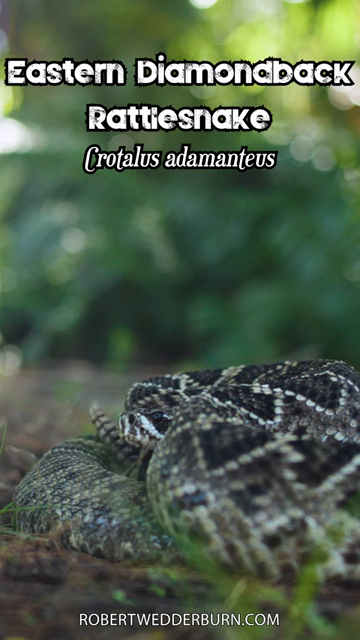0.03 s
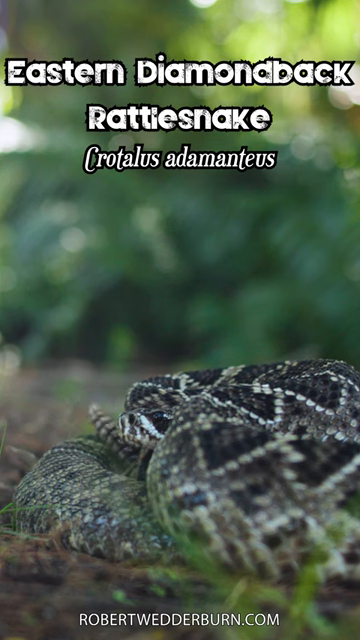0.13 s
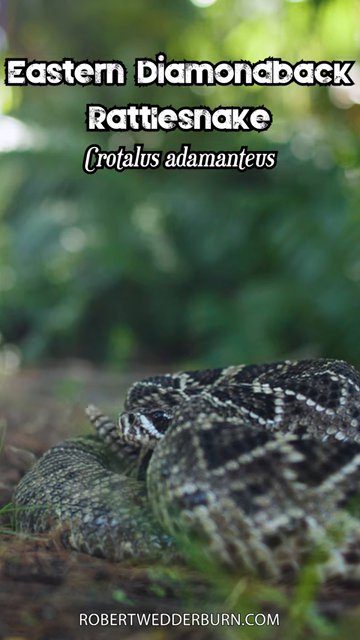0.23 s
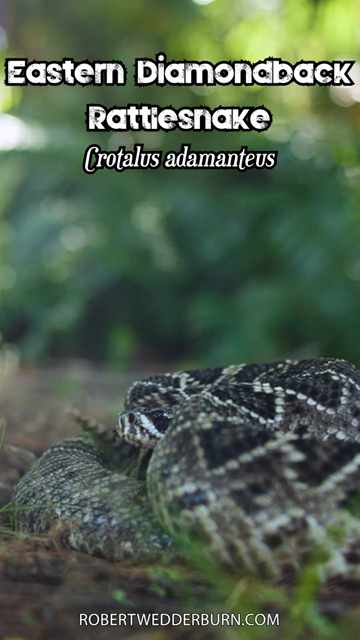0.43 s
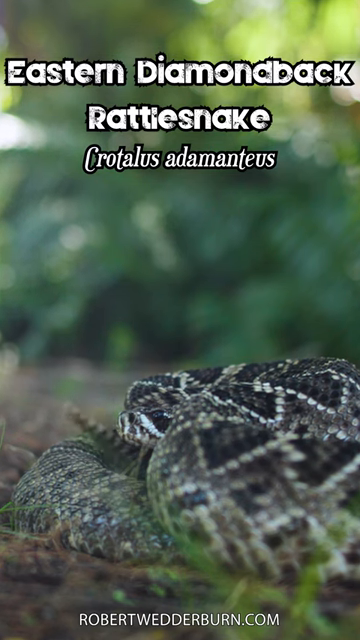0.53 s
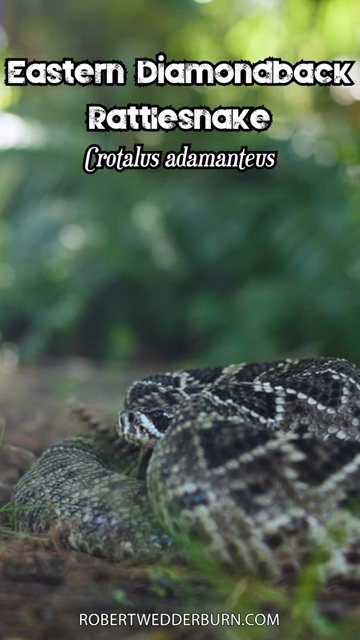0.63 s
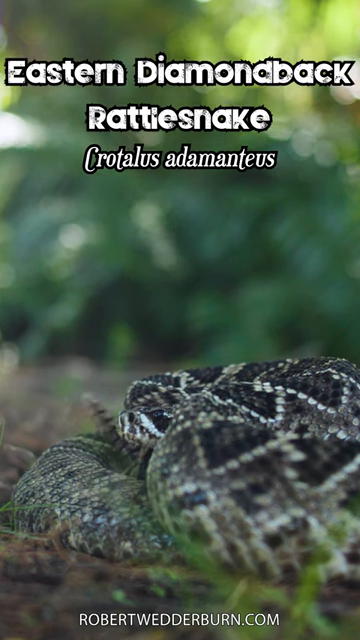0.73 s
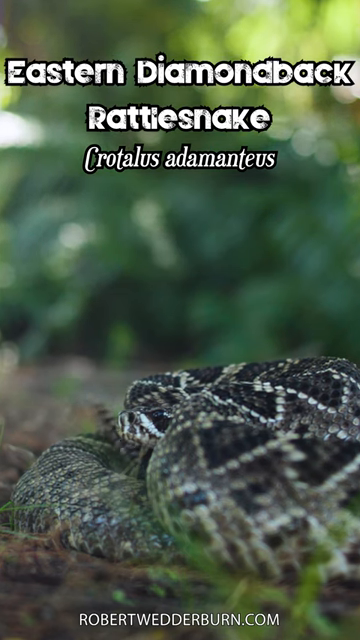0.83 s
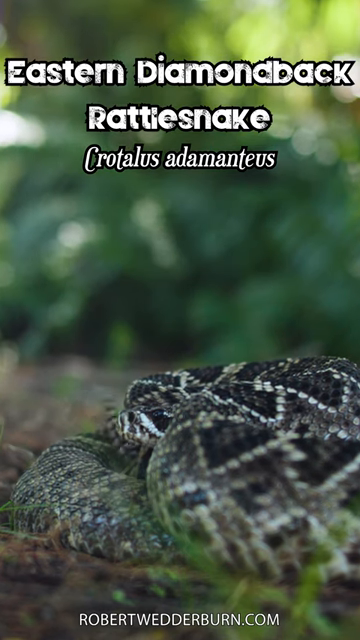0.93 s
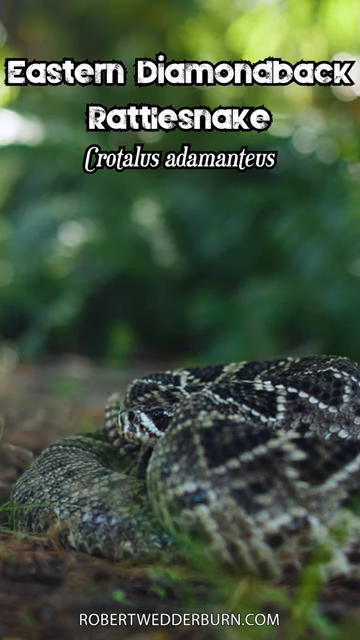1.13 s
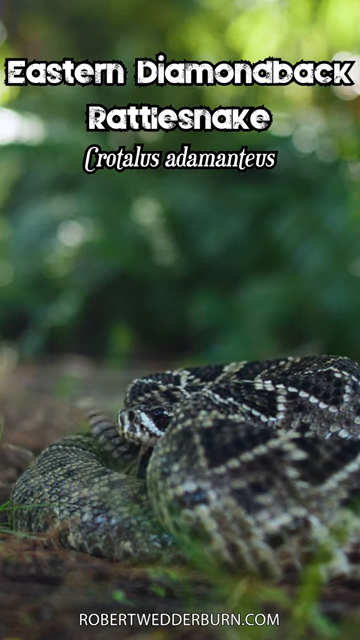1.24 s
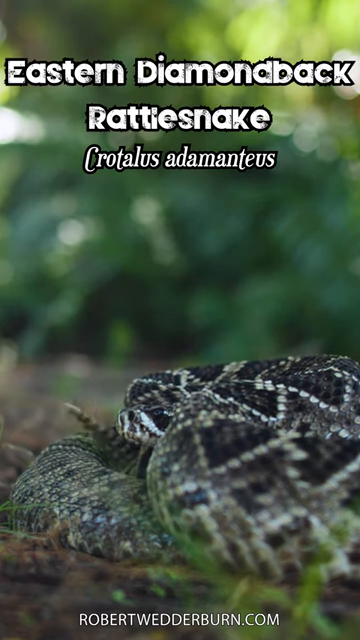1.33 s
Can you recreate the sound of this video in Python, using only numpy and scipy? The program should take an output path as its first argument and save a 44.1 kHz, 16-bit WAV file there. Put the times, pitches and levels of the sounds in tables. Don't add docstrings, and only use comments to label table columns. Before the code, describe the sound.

A rattlesnake's tail rattle buzzes close to a stereo microphone outdoors, starting almost at once and staying dense, dry and bright to the end, with tiny flickering gaps; a faint low bump comes midway.

```python
import sys
import numpy as np
from scipy import signal
from scipy.fft import rfft, irfft
from scipy.io import wavfile

SR = 44100
rng = np.random.default_rng(int(sys.argv[2]) if len(sys.argv) > 2 else 0)


def decibels_to_gain(level_db):
    exponent = np.asarray(level_db, float) / 20
    return 10 ** exponent


def digitize_waveform(pressure):
    field = np.atleast_2d(pressure).T
    bounded = np.clip(field, -1, 1)
    quanta = np.round(bounded * 32767).astype(np.int16)
    wavfile.write(sys.argv[1], SR, quanta)


N = 144207

# (time [s], level [dB])
VIGOUR = [
    (0.05, -109),
    (0.06, -59),
    (0.08, -32),
    (0.09, -21.5),
    (0.6, -21),
    (0.8, -20),
    (3.07, -20),
    (3.27, -19),
]


def rms_one(x):
    return x / np.sqrt(np.mean(x ** 2) + 1e-20)


def in_time(rows):
    s, *columns = np.transpose(rows)
    return [np.interp(np.arange(N) / SR, s, c) for c in columns]


def drift(rate_hz):
    r = np.exp(-2 * np.pi * rate_hz / SR)
    noise = rng.standard_normal(N + SR)
    return rms_one(signal.lfilter([1], [1, -2 * r, r * r], noise)[SR:])


def humps(rows, skew=0.68):
    t = np.arange(N) / SR
    total_db = 0
    for s, length, db in rows:
        side_length = length * np.where(t > s, skew, 1 / skew)
        total_db = total_db + db * np.exp(-0.5 * ((t - s) / side_length) ** 2)
    return total_db


def band(x, hz, width_hz):
    edges = np.clip([hz - width_hz / 2, hz + width_hz / 2], 10, 0.45 * SR)
    return signal.sosfilt(signal.butter(2, edges, "band", fs=SR, output="sos"), x)


def rumble():
    # (centre [Hz], level [dB per Hz])
    rumble_bands = [(25, -22), (60, -24), (110, 1.5), (200, 2.5), (300, -5), (500, -6.5), (1000, -28)]
    # (time [s], length [s], height [dB])
    swells = [
        (.95, 0.032, 5.5),
        (1.63, 0.022, 4.5),
        (2.68, 0.078, 3),
    ]
    level_db, alike = -58.5, -0.011
    out = 0
    for hz, band_db in rumble_bands:
        noise = rng.standard_normal((2, N))
        mid, side = band(noise, hz, 0.73 * hz) * decibels_to_gain(band_db + 1.5 * drift(12.5))
        out = out + np.sqrt(1 + alike) * mid + np.sqrt(1 - alike) * side * [[1], [-1]]
    fade_db = 1.7 * np.minimum(in_time(VIGOUR)[0] + 24, 0)
    return rms_one(out) * decibels_to_gain(level_db + fade_db + humps(swells))


def bump():
    # (pitch [Hz], left level [dB], right level [dB], 60 dB decay [s], onset [s])
    mount_modes = [
        (103, -15, -25, 0.11, 1.694),
        (185, -28, -13, 0.07, 1.6885),
        (300, -14, -31, 0.031, 1.6858),
        (435, -26, -32, 0.11, 1.686),
        (630, -29.5, -30, 0.071, 1.686),
        (1055, -23, -26, 0.027, 1.688),
    ]
    rise_s, floor_hz, top_hz = 0.002, 80, 1350
    out = np.zeros((2, N))
    for k, (hz, left_db, right_db, t60, s) in enumerate(mount_modes):
        t = np.maximum(np.arange(N) / SR - s, 0)
        ring = np.sin(2 * np.pi * hz * t) * decibels_to_gain(-60 * t / t60) * (1 - np.exp(-t / rise_s))
        right_sign = 1 if k > 1 else -1
        out += decibels_to_gain(np.array([[left_db], [right_db]])) * ring * [[1], [right_sign]]
    return signal.sosfilt(signal.butter(3, [floor_hz, top_hz], "band", fs=SR, output="sos"), out)


def throb_db():
    # (time [s], bounce [cycles], swing [cycles])
    lead = [(0.08, 0.88, 0.18), (0.27, 1.21, 0.27), (0.46, 0.99, 0.33), (0.64, 0.88, 0.27),
            (0.83, 0.9, 0.33), (1.02, 0.55, 0.62), (1.21, 0.64, 0.81), (1.39, 0.62, 0.8),
            (1.58, 0.91, 0.77), (1.77, 0.96, 0.83), (1.96, 0.88, 0.63), (2.14, 1.01, 0.45),
            (2.33, 0.97, 0.27), (2.52, 0.95, 0.32), (2.71, 1.73, 0.65), (2.89, 2.06, 1.0),
            (3.08, 1.54, 1.91), (3.27, 1.47, 3.23)]
    # (time [s], share [1])
    order = [(.1, 1.38), (.5, 1.2), (.85, 0.61), (1.05, 1.14), (1.35, 1.01), (1.65, 0.99), (2.0, 1.2),
             (2.25, 0.9), (2.6, 0.95), (3.0, 0.89), (3.27, 0.76)]
    # (time [s], level against usual [dB])
    free_flights = [(0.121, 0), (0.234, -22), (0.273, -10), (0.29, -15), (0.348, -26), (0.431, -22),
                    (0.549, -14), (0.608, -34), (0.663, -26), (0.716, -28), (1.108, -24), (1.161, -20),
                    (1.217, -24), (1.361, -20), (1.541, -32), (1.601, -19), (1.769, -49), (1.825, -19),
                    (1.864, -8), (1.882, -14), (1.997, -11), (2.052, -24), (2.075, -21), (2.09, -14),
                    (2.111, -39), (2.166, -36), (2.335, -29), (2.394, -29), (2.449, -30), (2.664, -16)]
    # (time [s], level against usual [dB])
    landings = [(0.157, 12.5), (0.255, 21), (0.31, 10), (0.515, 20), (0.568, 20), (1.014, 15), (1.128, 1),
                (1.238, 5), (1.327, 23), (1.383, 14), (1.452, 4), (1.506, 11), (1.563, 7), (1.633, 24),
                (1.677, 7), (1.791, 10), (1.844, -10), (1.903, 4), (1.949, -3), (2.016, -15), (2.071, 31),
                (2.246, -10), (2.415, 21), (2.471, 11), (2.516, 10), (2.572, 31), (2.745, 6), (2.853, 18),
                (3.013, 29), (3.057, 16)]
    bounce_hz, swing_hz = 70.5, 89.0
    t = np.arange(N) / SR
    bounce_lead, swing_lead = in_time(lead)
    a = 2 * np.pi * (bounce_hz * t + bounce_lead)
    b = 2 * np.pi * (swing_hz * t + swing_lead)
    coupled = 3.5 * np.cos(a + 0.4)
    coupled += 0.6 * np.cos(2 * a - 2.2)
    coupled += 1.5 * np.cos(a - b + 0.033)
    coupled += 0.9 * np.cos(2 * a - b + 2.7)
    coupled += 0.3 * np.cos(3 * a - 2 * b - 0.41)
    swing = 2 * np.cos(b + 0.15) + 1.45 * np.cos(a - 2 * b - 1.65)
    lull_db = humps([(s, 0.0025, 0.64 * db) for s, db in free_flights], 1.3)
    slam_db = humps([(s, 0.00054, 0.31 * db) for s, db in landings], 0.42)
    uneven_db = 1.08 * drift(125)
    return in_time(order)[0] * coupled + swing, lull_db, slam_db + uneven_db


def rattle():
    # (centre [Hz], width [Hz], level [dB], part unshared between the ports [dB])
    shell = [(1012, 536, -32, -11.5), (1562, 578, -19.5, -62), (2356, 860, -21.5, -56),
             (3072, 470, -8, -22), (4182, 1400, -3, -7.5), (5440, 940, 0.5, -4), (6820, 853, 1.5, -34),
             (7220, 2340, -12.5, -7), (10010, 970, -13, -2), (11120, 540, -16, -19),
             (12230, 1090, -10.5, -12.5), (13400, 2300, -15.5, 1), (15400, 2000, -22, -9)]
    clacks_per_s, clack_spread_db, own_strength = 11000, 2.5, 2.06
    low_ring_hz = 1900
    knock_low_db, knock_high_db, knock_spread_db, knock_late_s = 25, 10, 3, 0.0008
    left_lag_s, left_db = 1.5e-5, 0.3

    spread_db = clack_spread_db * np.minimum(rng.exponential(1, N), 5)
    clacks = rng.choice([-1, 1], N) * (rng.random(N) < clacks_per_s / SR)
    regular_db, lull_db, chance_db = throb_db()
    hard = clacks * decibels_to_gain(regular_db + lull_db + chance_db + spread_db)
    even = clacks * decibels_to_gain(1.47 * regular_db + lull_db + 0.9 * (chance_db + spread_db) + 5.0)

    tops = signal.find_peaks(regular_db)[0]
    luck = rng.standard_normal((N, 2))
    late_samples = (knock_late_s * SR * np.abs(luck[tops, 0])).astype(int)
    knocks = np.zeros(N)
    knock_db = (regular_db + lull_db)[tops] + knock_spread_db * luck[tops, 1]
    knocks[np.minimum(tops + late_samples, N - 1)] = decibels_to_gain(knock_db)

    out = 0
    for hz, width_hz, level_db, side_db in shell:
        own = rng.standard_normal((2, N))
        if hz < low_ring_hz:
            struck = even
            knock = knocks * decibels_to_gain(knock_low_db)
        else:
            struck = hard
            knock = knocks * decibels_to_gain(knock_high_db) * own[0]
        shared = struck * (1 + own_strength * own[0]) + knock
        unshared = (struck + knock) * decibels_to_gain(side_db) * own[1]
        colour_db = drift(34.6)
        mid, side = band([shared, unshared], hz, width_hz) * decibels_to_gain(level_db + colour_db)
        out = out + np.array([mid + side, mid - side])
    lag = np.exp(-2j * np.pi * np.fft.rfftfreq(N, 1 / SR) * left_lag_s)
    left = irfft(rfft(out[0]) * lag, N) * decibels_to_gain(left_db)
    return rms_one(np.array([left, out[1]])) * decibels_to_gain(in_time(VIGOUR)[0])


def scene():
    return rumble() + bump() + rattle()


def top_cut(x):
    return signal.sosfilt(signal.butter(12, 16520, fs=SR, output="sos"), x)


def record(dry):
    limit, cutoff_hz = 0.8, 15800
    rounded = limit * np.tanh(dry / limit)
    cut = signal.ellip(14, 0.5, 90, cutoff_hz, fs=SR, output="sos")
    return top_cut(signal.sosfilt(cut, rounded))


dry = scene()
out = record(dry)
digitize_waveform(out)
```